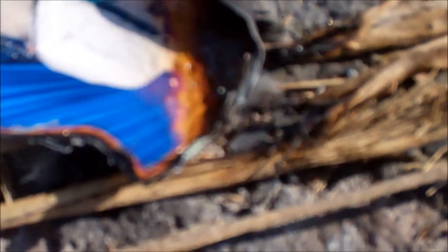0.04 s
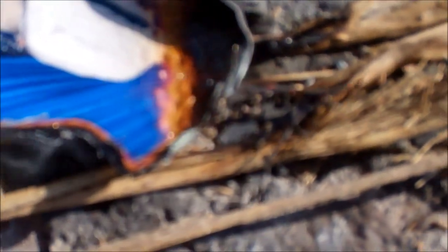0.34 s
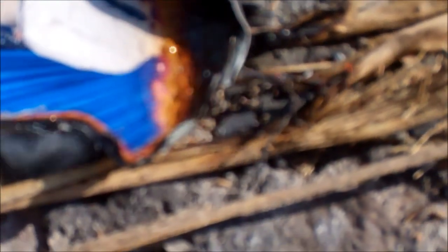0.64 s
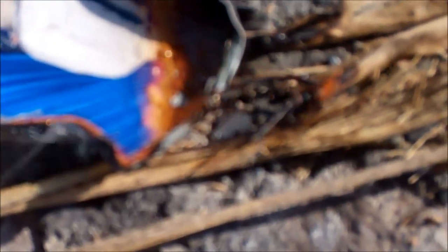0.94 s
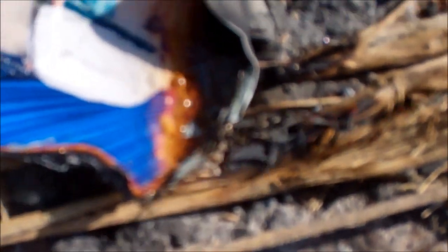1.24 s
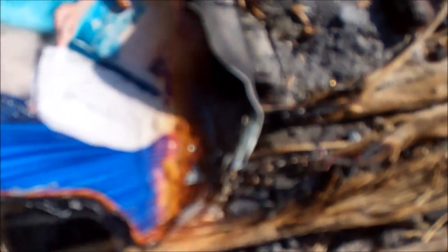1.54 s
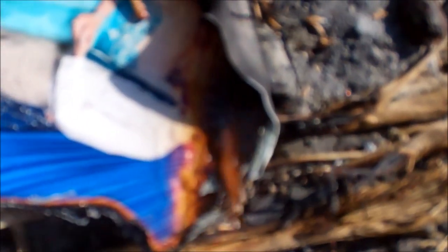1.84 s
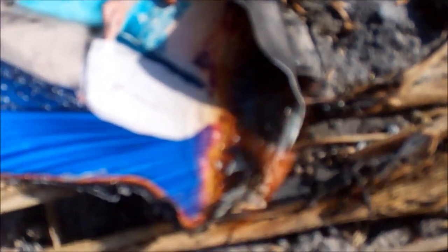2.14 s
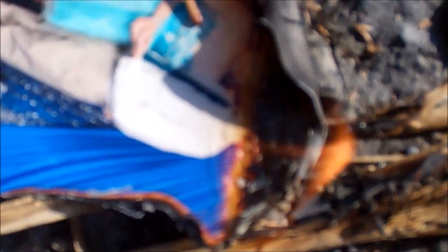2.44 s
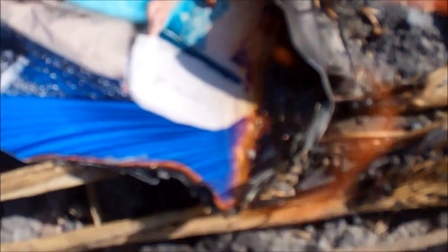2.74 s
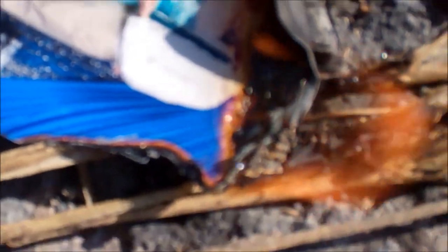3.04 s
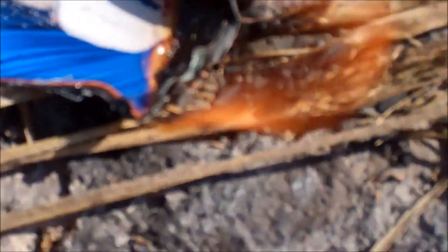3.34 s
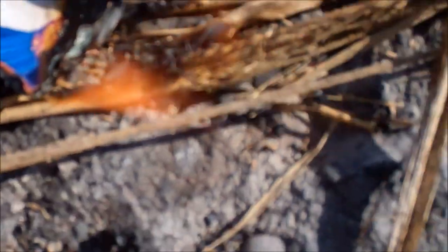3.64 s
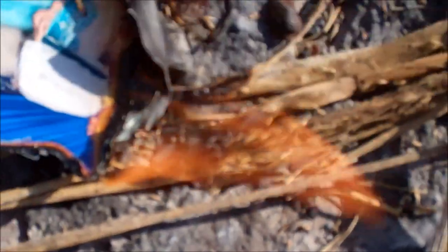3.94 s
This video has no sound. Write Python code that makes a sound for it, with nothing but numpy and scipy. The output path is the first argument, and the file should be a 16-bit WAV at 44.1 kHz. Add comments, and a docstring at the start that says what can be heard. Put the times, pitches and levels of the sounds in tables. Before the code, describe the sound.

A small fire hisses softly and close throughout, with a faint whistle, as a photograph smoulders on dry straw. A sharp pop comes at about 1.1 seconds and a brief puff at 1.4. From 2.8 seconds the flame rushes softly and stalks sputter and tick, with a cluster of sharp pops around 3.55 and fine crackling after. Light wind and a faint, low, pulsing drone lie behind.

```python
"""A photograph smoulders on dry straw, outdoors, close to a stereo microphone.
Its melting edge hisses and whistles faintly. As the flame spreads into the straw with a soft rush,
stalks vent sputtering jets of gas, tick and burst with sharp pops.
Behind the fire are light wind and a low beating drone, like a far engine."""
import sys
import numpy as np
from scipy import signal
from scipy.fft import rfft, irfft, next_fast_len
from scipy.io import wavfile
from scipy.ndimage import map_coordinates

SR = 44100
rng = np.random.default_rng(int(sys.argv[2]) if len(sys.argv) > 2 else 0)


def generate_wav(signal):
    """Clip the signal to [-1, 1] and save it as 16-bit WAV at the path in sys.argv[1]."""
    frames = np.transpose(np.atleast_2d(signal))
    scaled = np.clip(frames, -1, 1) * 32767
    pcm = np.round(scaled).astype(np.int16)
    wavfile.write(sys.argv[1], SR, pcm)


N = 176400
TIME = np.arange(N) / SR
TOP_HZ = 14300
PAN = np.array([[.5], [-.5]])  # splits a left-minus-right level between the channels


def amp(db):
    """Decibels to gain."""
    return 10 ** (np.asarray(db) / 20)


def unit(x):
    """x scaled to rms 1."""
    return x / np.sqrt(np.mean(x ** 2) + 1e-20)


def bell(x):
    """A Gaussian of height 1."""
    return np.exp(-.5 * x ** 2)


def along(points, hz):
    """Frequency-value points interpolated on a log axis."""
    f, values = np.transpose(points)
    return np.interp(np.log(hz + 1), np.log(f + 1), values)


def curves(rows):
    """One value per sample for each column after the time."""
    times, *columns = np.transpose(rows)
    return [np.interp(TIME, times, column) for column in columns]


def wobble(rate):
    """A smooth random curve, rate knots a second."""
    return map_coordinates(rng.standard_normal(int(N * rate / SR) + 4), [TIME * rate])


def filtered(x, gain):
    """x through a minimum-phase filter with the given gain of frequency."""
    n = x.shape[-1]
    m = 2 * next_fast_len(n)
    cepstrum = irfft(np.log(np.maximum(gain(np.fft.rfftfreq(m, 1 / SR)), 1e-6)))
    cepstrum[1:m // 2] *= 2
    cepstrum[m // 2 + 1:] = 0
    return irfft(rfft(x, m) * np.exp(rfft(cepstrum)), m)[..., :n]


def noise(colour, correlation):
    """Stereo noise of rms 1 with a given spectrum and left-right correlation."""
    hz = np.fft.rfftfreq(N, 1 / SR)
    angle = np.arccos(along(correlation, hz)) / 2
    spectrum = rfft(rng.standard_normal((2, N))) * amp(along(colour, hz))
    mid, side = irfft(spectrum * [np.cos(angle), np.sin(angle)], N)
    return unit(np.array([mid + side, mid - side]))


def snaps(times, spread_db, t60):
    """Tiny stereo snaps of scattered size at the given times, rms 1."""
    sizes = amp(spread_db * np.clip(rng.standard_normal(len(times)), -2, 2))
    signs = rng.choice([-1, 1], len(times))
    train = np.bincount(np.clip(times * SR, 0, N).astype(int), sizes * signs, N + 1)[:N]
    t = np.arange(SR // 100) / SR
    snap = 0.22 * rng.standard_normal((2, len(t))) * amp(-60 * t / t60)
    snap[:, 0] = 1
    return unit(signal.fftconvolve(train[None], snap, axes=1)[:, :N])


def flattened(burst):
    """A burst with the hollows of its spectrum mostly filled, rms 1."""
    n = burst.shape[-1]
    spectrum = rfft(burst, 2 * n)
    return unit(irfft(spectrum / np.abs(spectrum) ** .7)[..., :n])


def top_rolloff(hz):
    """The fire's sound thins out at the very top."""
    return 1 / np.sqrt(1 + (hz / TOP_HZ) ** 40)


def stalk(x, colour, low_hz, tilt, peak_hz, peak_db, width_oct):
    """A stalk colours x with a low edge, a treble slope and one resonance; rms 1."""
    def gain(hz):
        slope_db = tilt * np.log2(1 + hz / 1000)
        resonance_db = peak_db * bell(np.log2((hz + 1) / peak_hz) / width_oct)
        high_pass = 1 / np.sqrt(1 + (low_hz / (hz + 1)) ** 10)
        return amp(along(colour, hz) + slope_db + resonance_db) * high_pass * top_rolloff(hz)
    return unit(filtered(x, gain))


# The far drone's lower tone: t/s, f/Hz, beat rate/Hz, level/dB
DRONE = [(0, 70.2, 8.47, -73), (1, 70.08, 8.9, -57), (2.2, 70.47, 7.8, -52.5), (3.4, 71.97, 9.1, -52),
         (4, 72.5, 12.3, -51)]
# Its overtones: multiple of f, relative level/dB
DRONE_OVERTONES = [(2, -9.5), (3, -13.5), (3.5, -15)]

def drone():
    """In the distance, two close low tones beat under faint, unsteady overtones."""
    hz, beat_hz, db = curves(DRONE)
    phase, beat = 2 * np.pi * np.cumsum([hz, beat_hz], axis=1) / SR
    tones = np.sin(phase) + amp(-1.5) * np.sin(phase + beat)
    for multiple, level in DRONE_OVERTONES:
        tones += amp(level + 3 * wobble(4)) * np.sin(multiple * phase + wobble(6))
    return amp(db) * np.sqrt(2) * tones


# Breeze behind the fire: t/s, level/dB
WIND = [(0, -48), (2.4, -47.5), (3.2, -49)]
# Its spectrum: f/Hz, level/dB
WIND_COLOUR = [(25, -42), (58, -5.5), (95, -6.5), (150, -2.5), (320, -6.5), (420, -10), (1400, -14),
               (2400, -19.5), (14000, -44.5)]
# Its likeness across the microphone: f/Hz, left-right correlation
WIND_CORRELATION = [(120, .98), (600, 0.86), (2000, 0.23)]
# Gust peaks, dead centre: t/s, level/dB
GUSTS = [(.43, -48.5), (.67, -52), (.9, -49.5), (1.048, -52), (1.28, -51.5), (1.72, -48.5), (2.44, -48)]

def wind():
    """Light wind and far outdoor rumble, with small low gusts."""
    breeze = amp(curves(WIND)[0] + 0.61 * wobble(6.77)) * noise(WIND_COLOUR, WIND_CORRELATION)
    gust_hz, width_oct, swell_s = 176, 0.55, 0.044
    gust = unit(filtered(rng.standard_normal(N), lambda f: bell(np.log2((f + 1) / gust_hz) / width_oct)))
    swells = sum(amp(db) * bell((TIME - at) / swell_s) for at, db in GUSTS)
    return breeze + gust * swells


# The flame, close by: t/s, level/dB
FLAME = [(1.1, -75), (1.45, -51), (1.7, -63), (2.8, -57.5), (3, -49), (3.7, -58), (3.87, -45), (4, -54)]
# Its spectrum: f/Hz, level/dB
FLAME_COLOUR = [(200, 0), (700, 0), (2000, -0.5), (12000, -22)]
# The fire at the microphone, wide in the treble: f/Hz, left-right correlation
FIRE_CORRELATION = [(500, 1), (2000, 0.05), (4500, 0.12)]

def flame():
    """The flame rushes softly and unevenly over the straw."""
    return amp(curves(FLAME)[0] + 3.5 * wobble(12)) * noise(FLAME_COLOUR, FIRE_CORRELATION)


# The photograph's burning edge, close up: t/s, level/dB
HISS = [(0, -46), (1.1, -44.5), (1.2, -43.5), (2.1, -43.5), (2.3, -42), (3.1, -42), (3.45, -38), (4, -40)]
# Its spectrum: f/Hz, level/dB
HISS_COLOUR = [(600, -13), (2200, -3.5), (4200, -0.5), (8300, -4), (10500, -4), (14000, .5)]

def hiss():
    """The melting edge hisses without a break."""
    return amp(curves(HISS)[0] + 0.77 * wobble(25.37)) * noise(HISS_COLOUR, FIRE_CORRELATION)


# A faint whistle inside the hiss: t/s, level/dB
WHISTLE = [(.25, -58.5), (1, -57.5), (1.2, -54.5), (1.5, -57.5), (2.05, -57), (2.45, -51), (3.2, -58)]
# Its bands: f/Hz, half-width/Hz, relative level/dB
WHISTLE_BANDS = [(4880, 250, 1), (7250, 470, 0.5)]

def whistle():
    """Gas leaving the melting edge whistles breathily in two bands that swell and drift together."""
    drift_hz = 80.2 * wobble(5)
    shift = np.exp(2j * np.pi * np.cumsum(drift_hz) / SR)
    out = np.zeros((2, N))
    for hz, width, db in WHISTLE_BANDS:
        breath = filtered(noise(HISS_COLOUR, FIRE_CORRELATION), lambda f: 1 / (1 + ((f - hz) / width) ** 2))
        out += amp(db) * unit(np.real(signal.hilbert(breath) * shift))
    return amp(curves(WHISTLE)[0] + wobble(12.26)) * unit(out)


# Stalks venting near the microphone:
# peak t/s, rise/s, fall/s, level/dB, whistle f/Hz, low edge f/Hz, tilt/(dB/octave), sputter share
JETS = [(1.41, 0.053, 0.029, -43.5, 7150, 497, 1, 0), (2.985, 0.025, 0.045, -39.5, 3400, 2900, 1, 0),
        (3.236, 0.02, 0.011, -38.5, 4400, 2900, -1.5, 0.5),
        (3.368, 0.022, 0.0053, -29.5, 3670, 600, 0.5, .85), (3.656, 0.012, .014, -35, 5840, 2630, 0.5, 0.6),
        (3.775, 0.0098, .004, -41, 13000, 3500, 7, .7), (3.84, .012, 0.014, -37, 12000, 9500, 5, 0.5)]
# Spectrum of the straw's jets and crackle: f/Hz, level/dB
STRAW_COLOUR = [(300, 10), (900, -5.5), (2000, 2), (3300, 3.5), (7300, -1), (9300, 2.5), (11200, 1.5),
                (13500, 4)]

def jets():
    """Gas swells out of a stalk, partly as smooth hiss, partly as a fast uneven sputter."""
    sputter_per_s = 400
    slots = np.arange(int(sputter_per_s * N / SR))
    smooth = noise([(100, 0), (10000, 0)], FIRE_CORRELATION)  # white
    times = (slots + .35 * rng.standard_normal(len(slots))) / sputter_per_s
    sputter = snaps(times, spread_db=2.5, t60=.008)
    out = np.zeros((2, N))
    for at, rise, fall, db, hz, low_hz, tilt, share in JETS:
        span = (TIME > at - 3 * rise) & (TIME < at + 3 * fall)
        flow = np.sqrt(1 - share) * smooth[:, span] + np.sqrt(share) * unit(sputter[:, span])
        flow = stalk(flow, STRAW_COLOUR, low_hz, tilt, hz, peak_db=6, width_oct=0.24)
        age = TIME[span] - at
        out[:, span] += amp(db) * flow * bell(age / np.where(age < 0, rise, fall))
    return out


# Fine crackle in the nearby straw: t/s, level/dB
CRACKLE = [(0, -62.5), (2.5, -61), (3.1, -56), (3.5, -44), (4, -55)]

def crackle():
    """Countless tiny ticks, louder as the straw catches."""
    ticks_per_s, tilt_db_per_oct = 130, 3
    times = rng.uniform(0, N / SR, int(ticks_per_s * N / SR))
    ticks = filtered(snaps(times, spread_db=4, t60=0.0036),
                     lambda f: amp(along(STRAW_COLOUR, f) + tilt_db_per_oct * np.log2(f + 1)) * top_rolloff(f))
    return amp(curves(CRACKLE)[0]) * unit(ticks)


# Stalks bursting right at the microphone:
# t/s, level over 1 ms/dB, low edge f/Hz, tilt/(dB/octave), ring f/Hz, t60/s, left minus right/dB
POPS = [(1.0762, -14, 40, 1, 7850, 0.0077, 2.5), (3.5274, -20.5, 5100, -8, 8500, .01, -2),
        (3.529, -24, 2290, -4.5, 7800, 0.016, -1), (3.5588, -14.5, 3500, -1, 4484, 0.0064, 1),
        (3.5613, -17.5, 3570, -6, 7500, 0.022, -11), (3.5655, -21, 3020, -2, 4530, .012, 8),
        (3.5693, -23.5, 3060, -7, 12500, 0.016, -1), (3.5812, -26, 2600, 0.5, 4300, 0.049, -1)]
# Fibres ticking, centre: t/s, level over 1 ms/dB, low edge f/Hz
FIBRE_TICKS = [(.7942, -29.5, 7000), (2.819, -31, 1200), (3.2045, -34, 2430), (3.2914, -33, 1790),
               (3.4465, -32, 3500), (3.474, -29.5, 2610), (3.4828, -31, 3500), (3.495, -39, 3500),
               (3.501, -35, 3000), (3.631, -38, 3500), (3.737, -48, 5045), (3.7908, -31, 3500),
               (3.8133, -37, 2800)]
# Spectrum of both: f/Hz, level/dB
POP_COLOUR = [(150, 5.5), (700, 2), (1800, -3), (4500, -0.5), (6200, -2.5), (7600, -1), (11200, 0),
              (13300, 9.5)]

def pops():
    """A stalk or fibre bursts: a snap, a brief ring, a low push of gas and faint scatter off the ground."""
    snap_share, push_s, scatter_t60 = 0.11, 0.00048, .025
    fibre_tilt, fibre_hz, fibre_t60 = -2.5, 4530, 0.0055
    fibres = [(at, db, low_hz, fibre_tilt, fibre_hz, fibre_t60, 0) for at, db, low_hz in FIBRE_TICKS]
    out, t = np.zeros((2, N + SR)), np.arange(SR // 20) / SR
    snap = unit(1. * (t == 0))
    push = amp(-17.5) * unit((1 - t / push_s) * np.exp(-t / push_s))
    for at, db, low_hz, tilt, hz, t60, pan_db in POPS + fibres:
        ring = unit(rng.standard_normal(len(t)) * amp(-60 * t / t60))
        scatter = amp(-18) * unit(rng.standard_normal((2, len(t))) * amp(-60 * t / scatter_t60))
        crack = flattened(np.sqrt(1 - snap_share) * ring - np.sqrt(snap_share) * snap)
        burst = stalk(crack + scatter - push, POP_COLOUR, low_hz, tilt, hz, peak_db=7, width_oct=0.19)
        burst *= np.sqrt(SR / 1000 / len(t))  # the energy of 1 ms at rms 1
        start = round(at * SR)
        out[:, start:start + len(t)] += burst * amp(db + pan_db * PAN)
    return out[:, :N]


def scene():
    """Drone and wind behind, the fire in front."""
    return drone() + wind() + flame() + hiss() + whistle() + jets() + crackle() + pops()


# Balance of the stereo image: f/Hz, left minus right/dB
STEREO_BALANCE = [(600, -0.46), (2500, 0.9), (8000, 2), (13000, 0)]

def record(dry):
    """The fire's treble leans slightly to the left; nothing above TOP_HZ is kept."""
    m = next_fast_len(N + SR // 2)
    hz = np.fft.rfftfreq(m, 1 / SR)
    balance = amp(PAN * along(STEREO_BALANCE, hz))
    return irfft(rfft(dry, m) * balance * (hz < TOP_HZ), m)[:, :N]


dry = scene()
out = record(dry)
generate_wav(out)
```